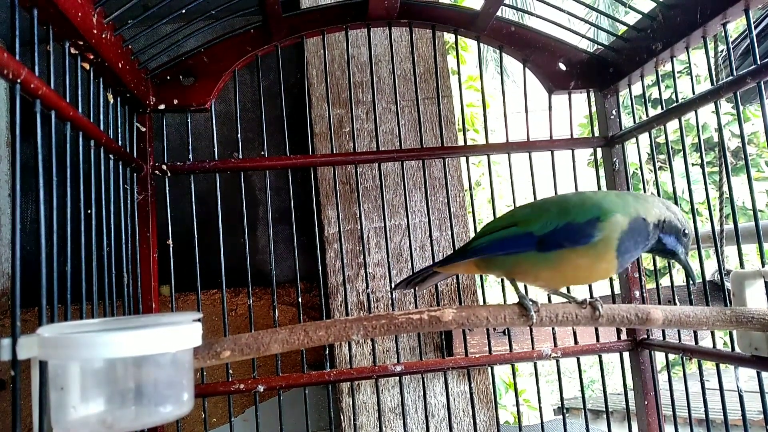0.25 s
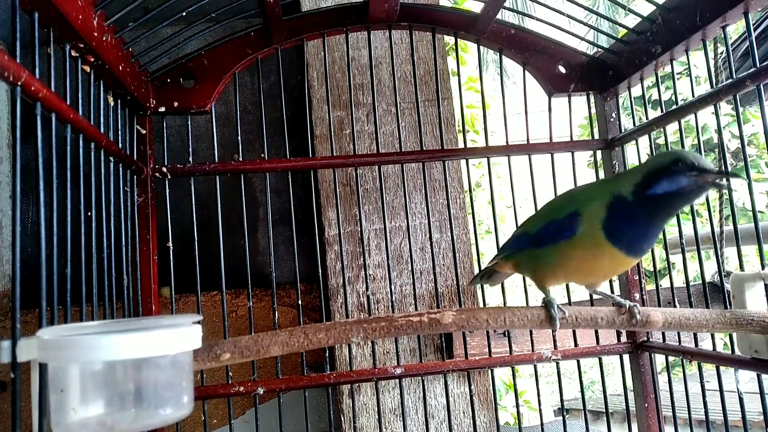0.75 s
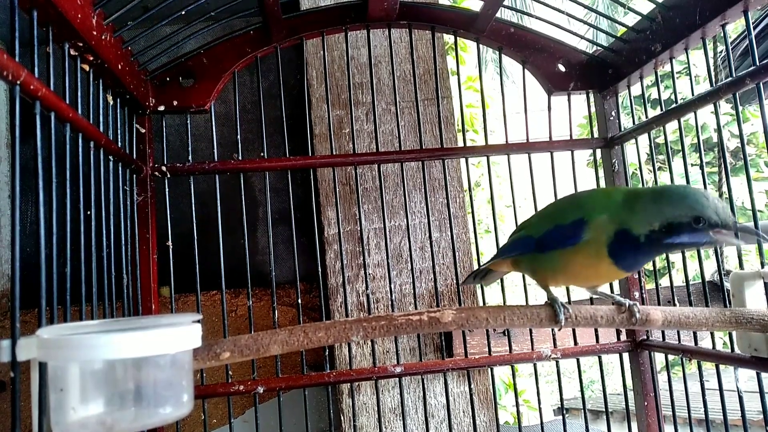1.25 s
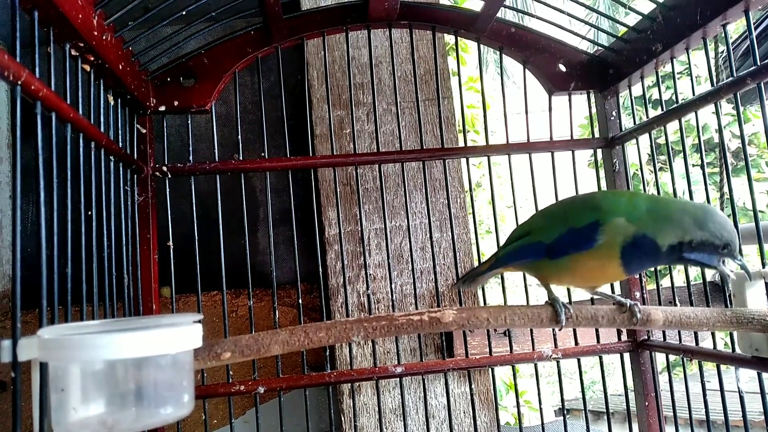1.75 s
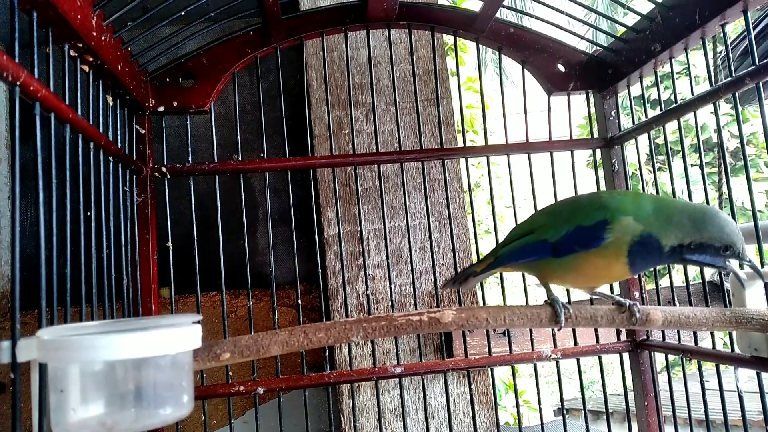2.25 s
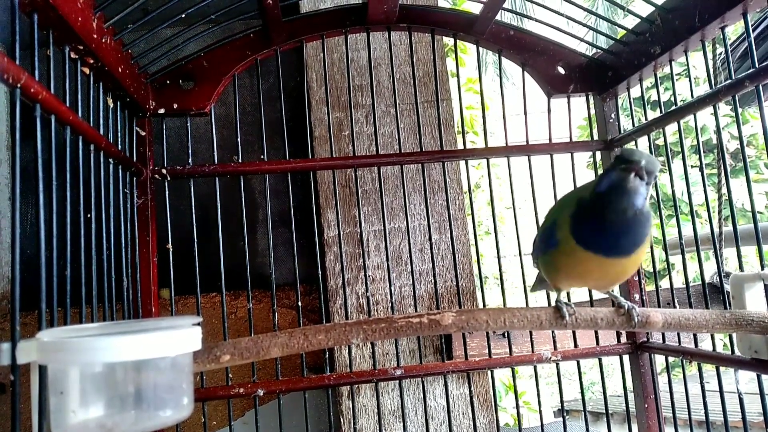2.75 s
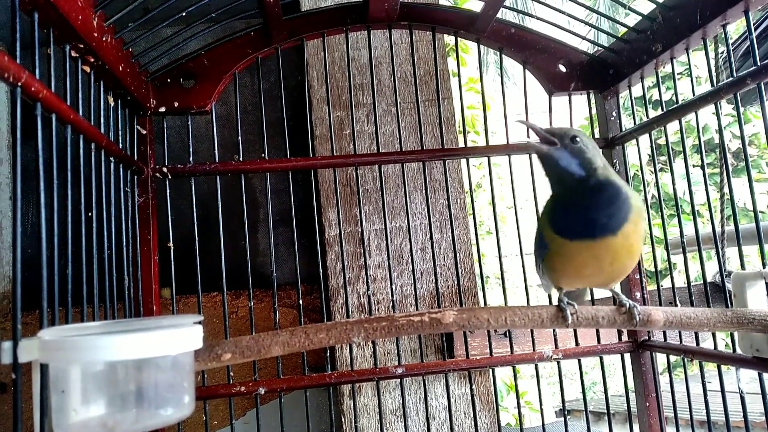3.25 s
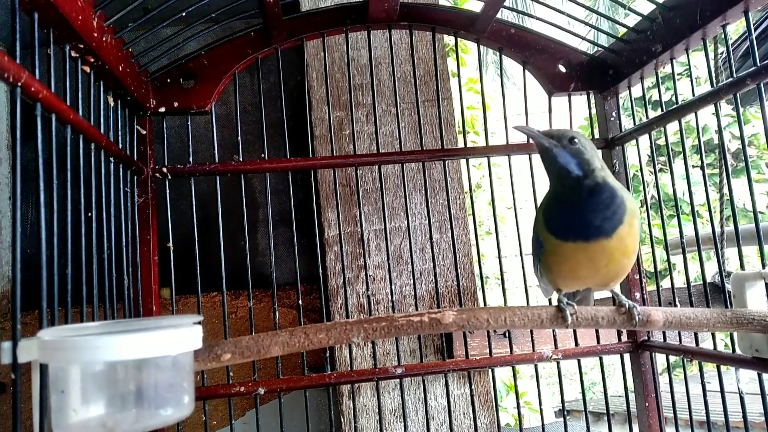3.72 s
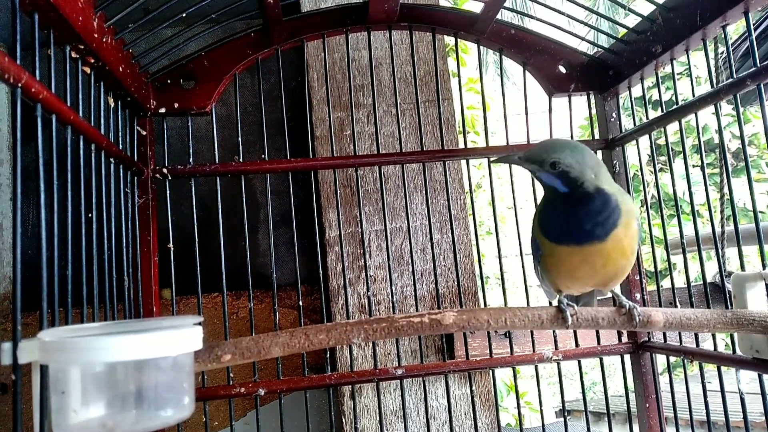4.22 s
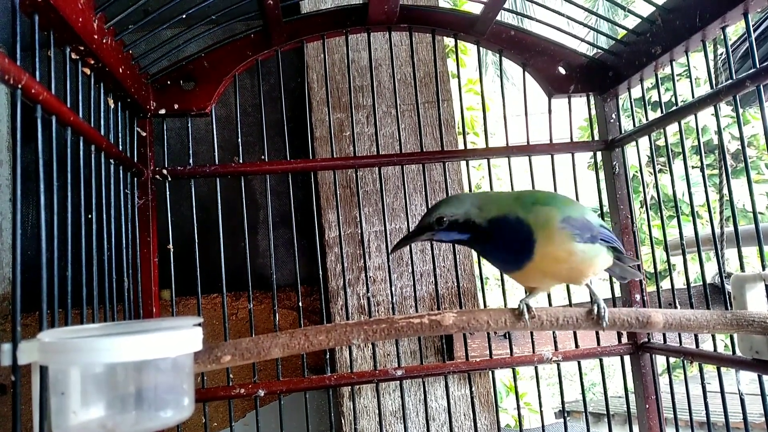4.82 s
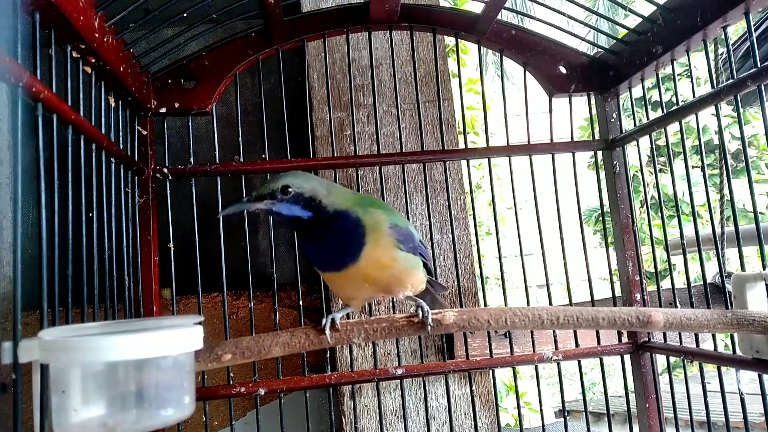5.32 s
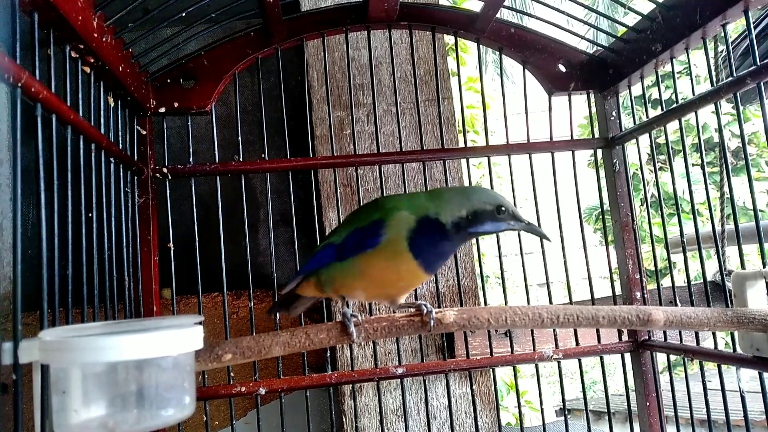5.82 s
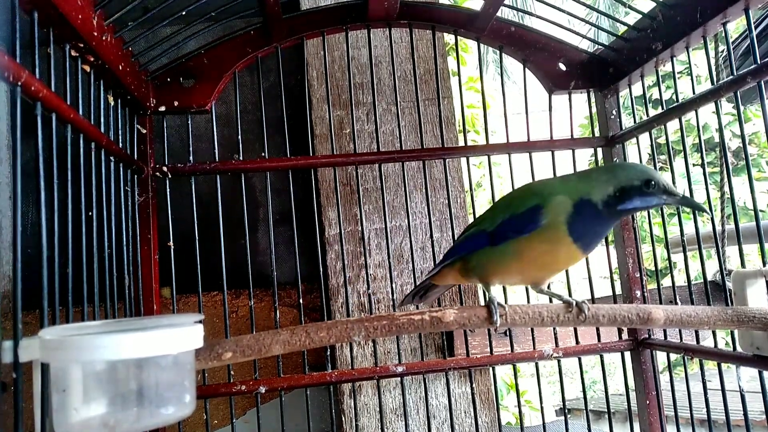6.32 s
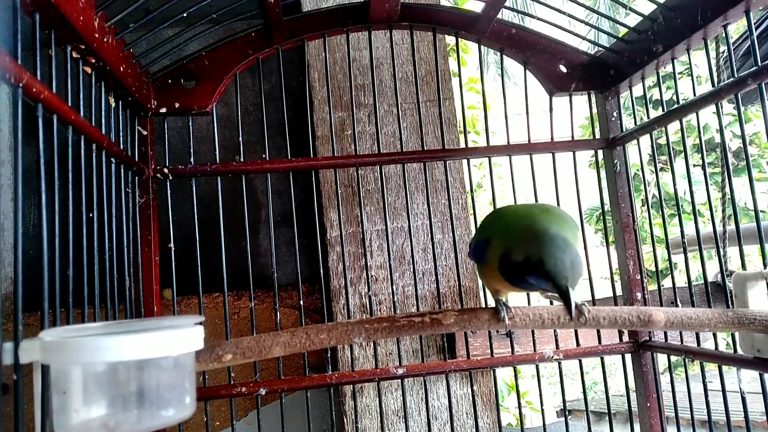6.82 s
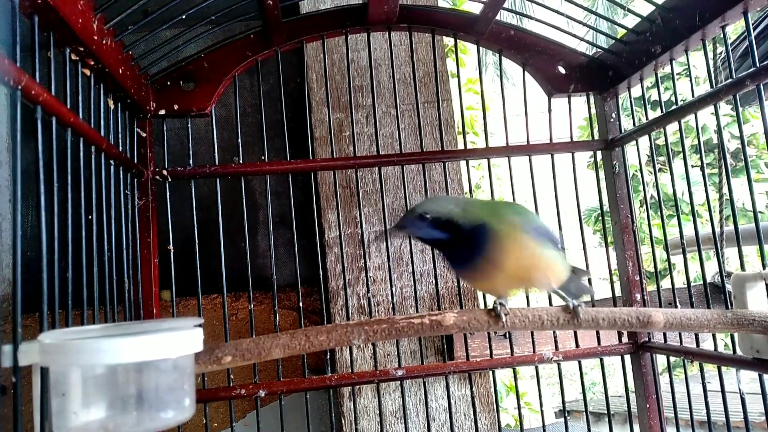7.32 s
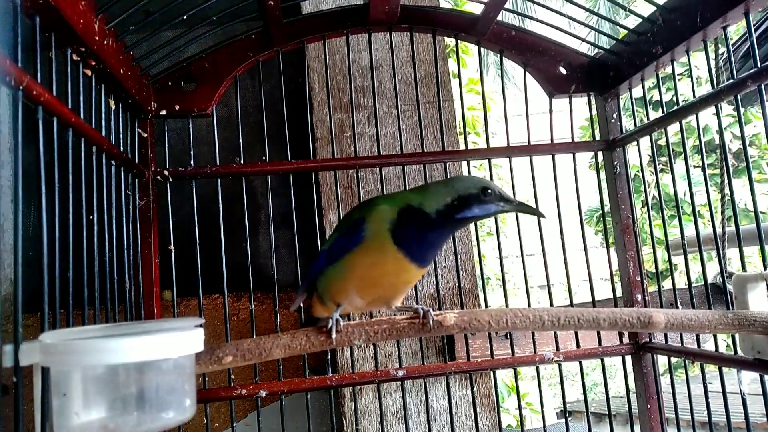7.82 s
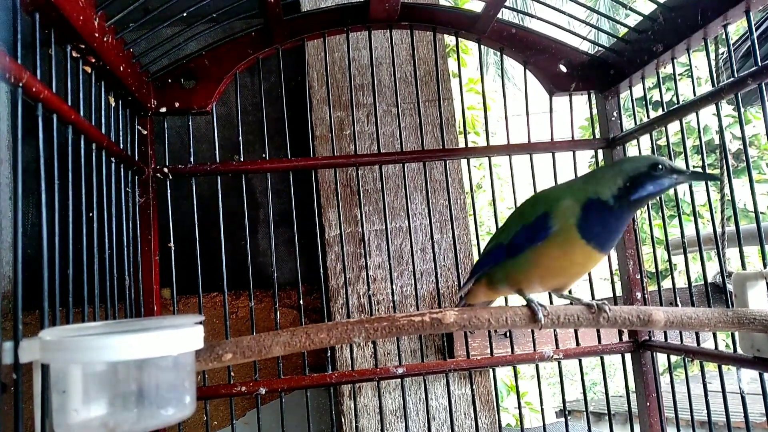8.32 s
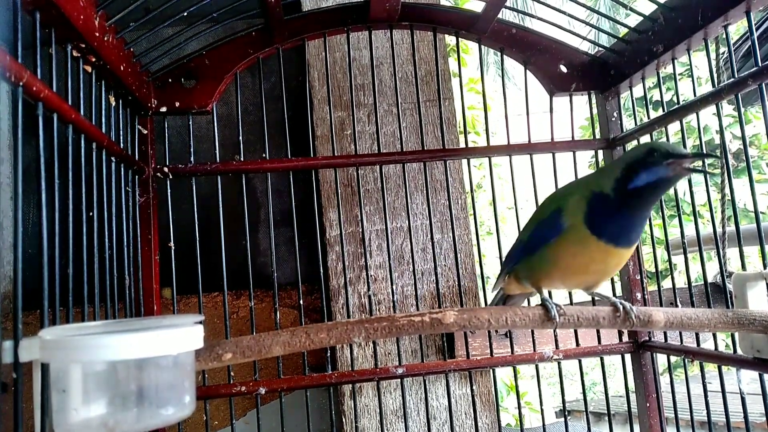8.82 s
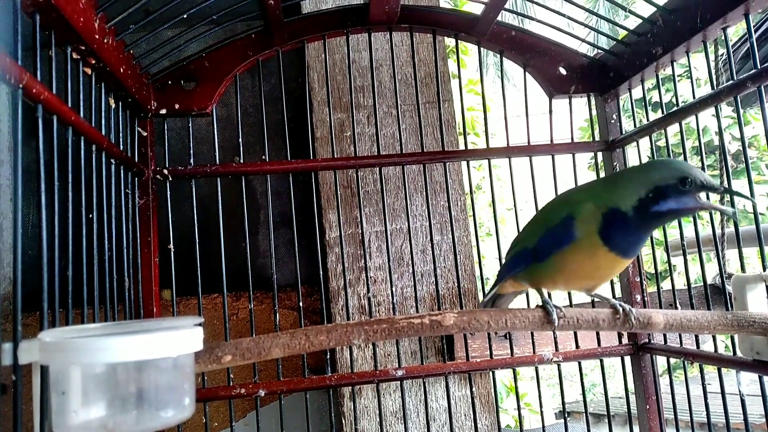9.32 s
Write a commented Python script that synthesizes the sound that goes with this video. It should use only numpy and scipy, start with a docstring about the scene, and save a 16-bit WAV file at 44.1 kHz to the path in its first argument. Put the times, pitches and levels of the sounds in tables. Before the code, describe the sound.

Loud chattering, buzzing bird scolding erupts near the microphone on a hard-walled porch, with far birds warbling, a very high insect tick and hopping knocks.

```python
"""A caged songbird rattles and rasps close to a two-port microphone on a small hard-walled porch.
Other birds whistle further off, an insect ticks very high, wood and wires knock and clink, and a low
hum wavers under a hiss whose treble swells now and then. Birds are phase oscillators with shaking
pitch, coloured by throat and breath; ticks and blows are noise bursts ringing resonances; hum and hiss
are shaped noise, with a drone of gliding tones. Decaying noise echoes form the porch and the yard."""
import sys
import numpy as np
from scipy import signal
from scipy.fft import rfft, irfft
from scipy.io import wavfile
from scipy.ndimage import uniform_filter1d, minimum_filter1d

SR = 44100
rng = np.random.default_rng(int(sys.argv[2]) if len(sys.argv) > 2 else 0)


def store_pcm(level_fs):
    """Save levels as 16-bit WAV."""
    pcm = np.round(np.clip(level_fs, -1, 1) * 32767).astype(np.int16)
    wavfile.write(sys.argv[1], SR, np.atleast_2d(pcm).T)


N = 421596
T = np.arange(N) / SR


def undb(db):
    """Amplitude ratio of a level in decibels."""
    return 10 ** (np.asarray(db) / 20)


def unit(x):
    """Normalization to a root-mean-square of one."""
    return x / np.sqrt(np.mean(x ** 2))


def walk(rate, size=N):
    """Slow noise by sample and hold: random levels held 1 / rate s, then slewed; spread near 1."""
    k = max(int(SR / rate), 2)
    held = np.repeat(rng.standard_normal(size // k + 1), k)
    return 1.32 * uniform_filter1d(held, k)[:size]


def resonate(x, modes):
    """Modal superposition: a sum of two-pole resonances (pitch_hz, width_hz, level_db)."""
    return sum(undb(db) * signal.lfilter(*signal.iirpeak(hz, hz / width, fs=SR), x)
               for hz, width, db in modes)


def add(out, s, x):
    """Linear superposition of x on out from s seconds."""
    i = int(s * SR)
    out[i:i + len(x)] += x[:len(out) - i]


def lay(table):
    """Linear interpolation of a curve table: start time, soft-edged window and its columns by sample."""
    s, *columns = np.transpose(table)
    t = np.arange(s[0], s[-1], 1 / SR)
    edge = np.clip(np.minimum(t - s[0], s[-1] - t) / .004, 0, 1)
    return s[0], edge, [np.interp(t, s, c) for c in columns]


def tone(hz, jitter, rate):
    """Frequency modulation: the phase is the integral of a pitch that shakes by the share jitter."""
    return np.cumsum(2 * np.pi * hz * (1 + jitter * walk(rate, size=len(hz))) / SR)


def flutter(size, hz, depth, start):
    """Amplitude modulation: a quick uneven throb of beating membranes, from a share of its cycle."""
    phase = tone(np.full(size, hz), 0.091, 52.9) + 2 * np.pi * start
    return unit(1 + depth * np.sin(phase))


def glides(tables, jitter, rate=360.0):
    """Frequency-modulated near-sine notes following curves of (time_s, pitch_hz, level_db)."""
    out = np.zeros(N)
    for note in tables:
        s, edge, (hz, db) = lay(note)
        add(out, s, np.sqrt(2) * undb(db) * edge * np.sin(tone(hz, jitter, rate)))
    return out


def slides(rows, swell_db, fade_db):
    """Piecewise-linear glides: notes swell, slide to a turning pitch and fade towards their end pitch."""
    curves = []
    for s, length, start_hz, turn_hz, end_hz, turn, db in rows:
        early_hz = start_hz + 0.3 * (turn_hz - start_hz)
        curves.append([(s, start_hz, db - 13.5), (s + 0.3 * turn * length, early_hz, db - swell_db),
                       (s + turn * length, turn_hz, db), (s + length, end_hz, db - fade_db)])
    return curves


def place(x, t60, wet_db, tail_t60, tail_db, pan_db):
    """Reverberation and arrival delay: left port first, then echoes of near walls and wider yard."""
    port_lag_s = 5 / 44100
    t = np.arange(int(.6 * SR)) / SR
    late = np.clip(t / 0.0012 - 1, 0, 1)
    walls = unit(late * 1000 ** (-t / t60)) * undb(wet_db)
    yard = unit(late * 1000 ** (-t / tail_t60)) * undb(tail_db)
    # each port has its own echo
    echo = (walls + yard) * rng.standard_normal((2, len(t))) / np.sqrt(len(t))
    echo[0, 0] += undb(pan_db / 2)
    echo[1, round(port_lag_s * SR)] += undb(-pan_db / 2)
    return signal.oaconvolve(x[None], echo, axes=1)[:, :N]


def rumble():
    """Resonant filtering of noise: low modes make a wavering hum, nearly alike at both ports."""
    # level before the waver: time_s, level_db
    hum_level = [(0.0, -57), (0.12, -47), (0.85, -48.5), (2.6, -47), (3.89, -48), (4.049, -109),
                 (4.15, -49), (4.26, -40), (4.39, -57), (4.52, -46.5), (4.76, -47), (5.06, -69),
                 (5.22, -42), (5.3, -61), (6.47, -60), (6.52, -44), (6.9, -48), (7.1, -54), (7.64, -42.5),
                 (8.2, -40.5), (8.49, -42.5), (9.2, -40), (9.35, -50.5), (9.56, -43)]
    # low resonances: pitch_hz, width_hz, level_db
    low_modes = [(73, 188, -3.5), (100, 6.9, 10), (125, 5, -25)]
    waver_db, waver_per_s = 3.5, 6.5
    s, db = np.transpose(hum_level)
    mid, side = rng.standard_normal((2, N))
    ports = mid + 0.11 * side * np.array([[1], [-1]])
    low = unit(resonate(resonate(ports, low_modes), [(100, 97, 0)]))
    return low * undb(np.interp(T, s, db) + waver_db * walk(waver_per_s))


def air():
    """Spectral shaping of noise: a hiss more alike at both ports in the bass than in the treble."""
    # relative spectrum of the hiss: frequency_hz, density_db
    spectrum = [(18, -60), (30, -25), (108, -3.5), (177, -9), (249, -9), (292, -20.5), (332, -11),
                (1590, -21.5), (3320, -25), (6210, -31), (11300, -32), (13600, -51), (15500, -32.5)]
    level_db, wander_db = -50.5, 0.5
    hz = np.maximum(np.arange(N // 2 + 1) * SR / N, 1)
    curve_hz, curve_db = np.transpose(spectrum)
    gain = undb(np.interp(np.log(hz), np.log(curve_hz), curve_db))
    mid, side = (rfft(rng.standard_normal(N)) * gain for _ in range(2))
    side = side * np.clip(0.35 + hz / 2100.0, 0, 1)
    return undb(level_db + wander_db * walk(3.2)) * unit(irfft([mid + side, mid - side], N))


def warble():
    """Frequency modulation: a far bird's sliding notes are near-sines of gliding pitch."""
    # notes: start_s, length_s, start_hz, turn_hz, end_hz, turn_share (of length), level_db (at the turn)
    far_notes = [(0.0, 0.066, 3490, 3533, 3530, 0.49, -42), (0.03, 0.088, 3680, 3910, 3840, 0.57, -53),
                 (0.155, 0.15, 3690, 2852, 2866, 0.46, -45.5), (0.4, 0.16, 3360, 3643, 3600, 0.38, -44.5),
                 (6.775, 0.15, 3510, 3547, 3550, 0.3, -47.5), (6.88, 0.083, 3220, 2790, 2800, 0.53, -39),
                 (7.16, 0.083, 3050, 3220, 3290, 0.32, -43.5), (7.245, 0.18, 3440, 3860, 3354, 0.4, -45.5),
                 (7.44, 0.09, 3030, 2800, 2820, 0.42, -42), (7.62, 0.076, 3095, 3340, 3270, 0.69, -43.5),
                 (7.68, 0.11, 3440, 3923, 3870, .65, -42), (7.8, 0.061, 2860, 2916, 2840, 0.28, -49),
                 (7.99, 0.076, 3060, 3290, 3260, 0.39, -44.5), (8.105, 0.041, 3010, 2840, 2544, 0.41, -43),
                 (8.255, 0.13, 3060, 3390, 3360, 0.7, -43), (8.4, 0.055, 3210, 2930, 2900, 0.54, -43.5)]
    return glides(slides(far_notes, 0.69, 4.6), 0.018)


def ticks():
    """Resonance under friction: an insect's short scrape rings a narrow, very high mode."""
    # a little under five a second: time_s (8 ms into the scrape), peak_db (before placing)
    tick_rows = [(0.148, -37), (0.359, -33), (0.567, -33.5), (3.441, -44), (3.643, -41), (3.839, -35.5),
                 (4.041, -42), (4.248, -36), (4.458, -39), (4.666, -37), (4.87, -37), (5.081, -37),
                 (5.286, -38.5), (5.493, -36), (5.692, -36.5), (5.91, -39), (6.125, -39), (6.335, -40),
                 (6.542, -36), (6.75, -40), (7.164, -33), (7.371, -31.5), (7.584, -35.5), (7.786, -33),
                 (7.992, -38), (8.21, -37), (8.421, -39)]
    centre_hz, spread_hz = 13650, 250
    out, t = np.zeros(N), T[:4000]
    for s, db in tick_rows:
        hz = centre_hz + spread_hz * rng.standard_normal()
        scrape = rng.standard_normal(len(t)) * (1 - np.exp(-t / .008)) ** 2 * 1000 ** (-t / .09)
        ring = resonate(resonate(scrape, [(hz, 700, 0)]), [(hz, 1300, 0)])
        add(out, s - .008, undb(db) * ring / abs(ring).max())
    return out


def knocks():
    """Modal excitation: feet and beaks strike perches and bars, an uneven blow waking wooden modes."""
    # blows: start_s, peak_db (of the dull part), brightness_db (bright peak over dull peak)
    blows = [(0.148, -56, 15), (0.352, -44.5, 11.5), (0.476, -35, -6), (1.408, -30, 8), (3.416, -46.5, 11),
             (3.545, -32.5, -50), (3.581, -40, -6), (3.766, -47.5, 7.5), (3.985, -50, 5),
             (4.311, -38.5, -19), (4.642, -40, -12), (5.047, -38.5, -15), (5.077, -35, -4.5),
             (5.1, -41.5, 7.5), (5.464, -39.5, -0.5), (5.62, -39.5, 6), (5.812, -40.5, 0.5),
             (5.845, -42.5, 4), (5.972, -38, -16), (6.221, -37, -26), (6.331, -40, 9.5), (6.536, -31.5, 0),
             (6.932, -52, 26), (7.2, -38.5, 0), (7.288, -40.5, 3), (7.328, -47, 3), (7.389, -40, 0.5),
             (7.667, -46, -13), (7.775, -43, 10), (7.864, -39, 2.5), (7.936, -36, -2), (8.056, -42.5, 11),
             (8.159, -38.5, -9), (9.476, -36.5, 6)]
    # dull modes before scatter: pitch_hz, width_hz, level_db
    dull_modes = [(413, 63, -6), (630, 92, 1), (918, 97, -1.5), (1300, 330, -12)]
    # bright modes before scatter: pitch_hz, width_hz, level_db
    bright_modes = [(1900, 1250, 8), (2800, 1100, 11), (5130, 8800, -13)]
    blow_t60_s, scatter_db = 0.095, 3.5
    out, t = np.zeros(N), T[:6000]
    for s, db, bright_db in blows:
        blow = rng.standard_normal(len(t)) * undb(3.9 * walk(252.0, size=len(t)))
        blow *= np.clip(t / 0.0013, 0, 1) * 1000 ** (-t / blow_t60_s)
        parts = []
        for modes in (dull_modes, bright_modes):
            # each blow lands elsewhere and wakes the modes differently
            woken = [(hz, width, mode_db + scatter_db * rng.standard_normal()) for hz, width, mode_db in modes]
            ring = resonate(blow, woken)
            parts.append(ring / abs(ring).max())
        dull, bright = parts
        add(out, s, undb(db) * (dull + undb(bright_db) * bright))
    return out


def whistles():
    """Frequency modulation: neighbouring birds' clear whistles are near-sines turning in pitch."""
    # notes: start_s, length_s, start_hz, turn_hz, end_hz, turn_share (of length), level_db (at the turn)
    clear_notes = [(0.536, 0.1, 2540, 2504, 2460, 0.59, -38.5), (1.022, 0.055, 2560, 2540, 2490, .7, -30),
                   (1.075, 0.091, 1808, 1928, 1820, 0.68, -13), (1.198, 0.083, 1938, 1942, 1803, 0.54, -14),
                   (1.32, 0.078, 1924, 1874, 1858, 0.56, -11), (1.5, 0.088, 1858, 1805, 1744, 0.67, -11)]
    return glides(slides(clear_notes, 4.0, 11.0), .011, 120.)


def syllables():
    """Pitch contours of membrane tension: dips that climb back, then arches that rise, hold and plunge.
    Rows: start_s, level_db, length_s, breath_db, places (shares), four pitches_hz, closing_fade_db."""
    # scolding dips: start_s, level_db, length_s, breath_db, lowest_hz
    dip_rows = [(0.648, -34, 0.036, 12, 2170), (0.667, -12, 0.061, -8.5, 1397), (0.72, -6, 0.049, -6, 1690),
                (0.78, -8.5, 0.033, -5.5, 1503), (0.823, -8.5, 0.051, -5, 1708),
                (0.882, -17, 0.046, 3, 1504), (1.603, -24, 0.042, -11, 903), (3.153, -9.5, 0.05, -1, 1050),
                (8.528, -36, 0.029, 9.5, 2190), (8.549, -16, 0.06, 0.5, 1388),
                (8.605, -15, 0.063, 0.5, 1373), (8.667, -21, 0.03, 6, 1023), (8.722, -33, 0.032, -4, 720),
                (9.095, -33, 0.04, -2, 786)]
    # places of the four pitches in a dip: share_of_length
    dip_places = [0., .2, .48, 1.]
    # rattle arches: start_s, level_db (before the fade), length_s, breath_db
    arch_rows = [(0.928, -18, 0.02, 11), (0.978, -19.5, 0.043, 6.5), (1.067, -16.5, 0.058, 1),
                 (1.146, -13.5, 0.054, 2.5), (1.249, -17.5, 0.056, 2.5), (1.328, -14.5, 0.069, -5.5),
                 (1.428, -9.5, 0.057, -4.5), (1.509, -27, 0.081, 7.5), (1.557, -13.5, 0.065, -3.5),
                 (1.628, -16, 0.063, -4.5), (1.712, -16.5, 0.054, -2.5), (1.786, -19, 0.053, 3),
                 (1.857, -28, 0.056, 7), (1.927, -17, 0.042, 2), (1.996, -13.5, 0.044, -1.5),
                 (2.068, -15.5, 0.041, 3), (2.131, -16.5, 0.047, -2.5), (2.196, -14.5, 0.048, -4),
                 (2.258, -10.5, 0.046, -10.5), (2.322, -9.5, 0.042, -9), (2.386, -11.5, 0.041, -5.5),
                 (2.449, -10.5, 0.035, -2.5), (2.514, -12, 0.042, -5.5), (2.576, -8, 0.045, -9),
                 (2.643, -10.5, 0.048, -5.5), (2.709, -8, 0.045, -6.5), (2.775, -7, 0.042, -9.5),
                 (2.842, -4, 0.039, -10), (2.91, -5.5, 0.043, -9), (2.969, -7.5, 0.047, -8),
                 (3.042, -10, 0.049, -5), (3.114, -12, 0.056, -3.5), (3.203, -19, 0.034, 3),
                 (3.266, -18, 0.06, -6), (8.693, -8, 0.036, -3.5), (8.744, -13, 0.047, -2.5),
                 (8.815, -2.5, 0.03, -7.5), (8.876, -6, 0.038, -5.5), (8.943, -12.5, 0.041, -0.5),
                 (9.001, -16, 0.042, 4), (9.06, -22.5, 0.045, 6.5), (9.109, -16.5, 0.064, -2.5),
                 (9.19, -18, 0.059, -3), (9.263, -18.5, 0.054, -2), (9.337, -23, 0.064, 2),
                 (9.409, -12, 0.055, -4), (9.496, -15.5, 0.054, -1)]
    # first and last pitch of an arch before scatter: pitch_hz
    arch_ends = [1552, 832]
    # drift of the arch tops through a bout, before scatter: time_s, early_hz, late_hz
    arch_tops = [(1.0, 2227, 2266), (1.6, 2250, 2145), (2.3, 2125, 2120), (2.7, 2135, 2040),
                 (3.0, 2232, 2212), (3.3, 2204, 2120), (8.7, 2245, 2440), (9.0, 2178, 2460),
                 (9.2, 2210, 2218), (9.5, 2247, 2164)]
    dip_from_hz, dip_to_hz, climb_share = 2350, 2522, 0.061  # share of the climb done at the third place
    rise_s, plunge_s, plunge_fade_db, pitch_scatter = 0.00704, 0.016, 6, 0.03
    rows = []
    for *row, low_hz in dip_rows:
        back_hz = low_hz + climb_share * (dip_to_hz - low_hz)
        rows.append((*row, dip_places, [dip_from_hz, low_hz, back_hz, dip_to_hz], 0))
    top_s, early, late = np.transpose(arch_tops)
    for s, db, length, breath_db in arch_rows:
        places = [0, min(rise_s / length, .4), max(1 - plunge_s / length, .45), 1]
        tops = [np.interp(s, top_s, early), np.interp(s, top_s, late)]
        pitch = np.array([arch_ends[0], *tops, arch_ends[1]])
        pitch = pitch * (1 + pitch_scatter * rng.standard_normal(4))
        rows.append((s, db, length, breath_db, places, pitch, plunge_fade_db))
    return rows


def rattle():
    """Source and filter: the throat favours overtones near its peaks, and taut membranes roughen.
    Returns the voice and its breath."""
    # throat response: frequency_hz, level_db
    throat = [(800, -6), (1400, -6), (2200, 7.5), (2750, 7), (3400, 5), (4200, 9), (5100, -5), (5600, 6),
              (6500, 5), (8000, 5), (10000, -60), (13000, -49)]
    # breath resonances: pitch_hz, width_hz, level_db (relative)
    breath_modes = [(4090, 740, 13), (5540, 300, 2), (7460, 750, 2), (9170, 730, -1.5), (13200, 1000, -32)]
    octave_at_24_db, octave_per_db = 8.5, 0.62  # octave boost of a -24 dB syllable, its rise with level
    hiss_db, hoarse_db = -5.5, -0.5  # hiss at the beak; noisy octave that rides on the pitch
    colour_scatter_db, crackle, dip_shake = 2.5, .45, .45
    slack_below_hz, slack_fade_db = 1600, 20
    out, gasps = np.zeros(N), np.zeros(N)
    throat_hz, throat_db = np.transpose(throat)
    for s, db, length, breath_db, places, pitch, fade_db in syllables():
        colour_db = colour_scatter_db * rng.standard_normal(size=7)  # the beak gapes differently each time
        octave_db = octave_at_24_db + octave_per_db * (db + 24.0)
        u = np.arange(int(length * SR)) / (length * SR)
        hz = uniform_filter1d(np.interp(u, places, pitch), 150)
        closing = (u - places[2]) / (1 - places[2])
        # arches stay rough up to the plunge; dips are cleaner
        arch = (fade_db > 0) * np.clip(1.2 - 1.5 * closing, 0, 1)
        taut = (hz / 2100) ** 3
        shake = np.clip(.03 + .05 * undb(breath_db), 0, .07) * np.maximum(taut, arch * .8)
        phase = tone(hz, shake * (1 if fade_db else dip_shake), 900.)

        # overtones fade when the membranes slacken
        slack_db = slack_fade_db * np.clip((slack_below_hz - hz) / 300, 0, 1)
        voice = np.zeros(len(u))
        for k in range(1, 7):
            overtone_db = np.interp(np.log(k * hz), np.log(throat_hz), throat_db) - 4.9 * k
            overtone_db = overtone_db + colour_db[k] + (k == 2) * octave_db - (k > 1) * slack_db
            voice += undb(overtone_db) * np.sin(k * phase)
        voice = unit(voice * (1 + arch * crackle * walk(500., size=len(u))))
        octave = np.sin(tone(2 * hz, 0, 900.))
        hoarse = undb(breath_db + hoarse_db) * taut * walk(1100., size=len(u)) * octave

        throb = flutter(len(u), 185.5, 0.32, rng.random())
        shape = undb(db - fade_db * np.clip(closing, 0, 1))
        shape = shape * (1 + np.clip(taut, 0, 1) * (throb - 1))
        shape *= np.clip((1 - u) * length / 0.00024, 0, 1)
        add(out, s, shape * np.clip(u * length / 0.0046, 0, 1) ** 2 * (voice + hoarse))
        # the breath leads the voice by 6 ms
        puff = undb(breath_db - 1.5 + 4.5 * walk(300., size=len(u)))
        add(gasps, s - .006, shape * taut * np.clip(u * length / .014, 0, 1) * puff)
    hiss = unit(resonate(rng.standard_normal(N), breath_modes))
    return out, undb(hiss_db) * gasps * hiss


def buzz():
    """Amplitude modulation: a deep throb chops nearly pure notes from the other side of the syrinx."""
    # notes: start_s, level_db (before weakening), length_s, start_hz, end_hz
    buzz_rows = [(0.751, -2.5, 0.023, 2325, 2710), (0.81, -12, 0.016, 2900, 2420),
                 (0.864, -9, 0.016, 2830, 2500), (0.914, -10.5, 0.029, 2600, 2550),
                 (0.998, -14, 0.012, 2550, 3050), (1.085, -10, 0.021, 2410.0, 2840),
                 (1.167, -6.5, 0.013, 2640, 2800.0), (1.273, -22, 0.041, 2450, 2940),
                 (1.355, -13.5, 0.035, 2480, 2720), (1.523, -12.5, 0.034, 3110, 3090),
                 (1.571, -6, 0.048, 2900, 3320), (1.634, -4.5, 0.048, 2800, 2960),
                 (1.654, -11.5, 0.045, 3470, 3610), (1.718, -1.5, 0.033, 2750, 3100),
                 (1.749, -15.5, 0.025, 3230, 3670), (1.796, -1.5, 0.031, 2800, 3270),
                 (1.801, -24, 0.036, 3504, 3720), (1.862, -8, 0.039, 2800, 3134),
                 (1.866, -8, 0.04, 3460, 3650), (1.934, 0, 0.02, 2965, 2997),
                 (2.006, -2.5, 0.024, 2910, 2870), (2.074, -4.5, 0.027, 2810, 2996),
                 (2.142, -13.5, 0.036, 2800, 3160), (2.214, -10.5, 0.026, 2730, 3110),
                 (2.292, -18.5, 0.016, 3630, 2730), (2.349, -21, 0.025, 3300, 2840),
                 (2.404, -14, 0.019, 3370, 2750), (2.475, -17.5, 0.017, 3390, 2640),
                 (2.789, -8.5, 0.018, 2280, 2800.0), (2.978, -18, 0.033, 2940, 2830),
                 (3.056, -2.5, 0.025, 3530, 3420), (3.127, 2.5, 0.026, 3500, 3700),
                 (3.16, -13.5, 0.031, 3400, 3750), (3.196, 2, 0.0283, 3514, 3736),
                 (3.227, -20, 0.022, 3480, 3570), (3.281, -4.5, 0.035, 3696, 3400),
                 (8.761, -10, 0.015, 2500, 2710), (8.954, -14, 0.023, 2455, 2880),
                 (9.01, -14, 0.028, 2650, 2910), (9.065, -11, 0.04, 2196, 3450),
                 (9.123, -5, 0.043, 3500, 3880), (9.153, -19, 0.04, 3600, 3210),
                 (9.199, -10, 0.019, 2480, 3590), (9.214, -7.5, 0.036, 3590, 3270),
                 (9.269, -9.5, 0.028, 2326, 3630), (9.293, -13, 0.039, 3480, 3150),
                 (9.342, -11, 0.027, 2377, 3550), (9.365, -11, 0.037, 3370, 3120),
                 (9.415, -8, 0.03, 2274, 3180), (9.438, -7, 0.026, 3290, 3163),
                 (9.499, -12, 0.027, 2250, 3190), (9.518, -11, 0.029, 3230, 3200)]
    low_loss_db_per_khz, fade_db = 13, 4  # weaker under 3 kHz; fades a little along the note
    out = np.zeros(N)
    for s, db, length, start_hz, end_hz in buzz_rows:
        u = np.arange(int(length * SR)) / (length * SR)
        edge = np.clip(np.minimum(u / .0015, (1 - u) / .004) * length, 0, 1)
        shape = edge * unit(flutter(len(u), 155., .9, -.1) ** 1.5)
        hz = start_hz + (end_hz - start_hz) * u
        weak_db = low_loss_db_per_khz * np.clip(3 - hz / 1000, 0, 1) + fade_db * (u - .5)
        jitter = np.clip(2.2 * length, .05, .075)  # long notes are hoarser
        add(out, s, np.sqrt(2) * undb(db - weak_db) * shape * np.sin(tone(hz, jitter, 900.)))
    return out


def clinks():
    """Modal ringing: short rattling noise excites the high resonances of thin wires."""
    # clinks: start_s, peak_db (before placing)
    clink_rows = [(3.641, -34.5), (4.0374, -30.5), (5.908, -36)]
    # wire resonances: pitch_hz, width_hz, level_db (relative)
    wire_modes = [(5690, 140, 5), (7030, 160, -1), (10530, 450, -13.5)]
    out, t = np.zeros(N), T[:6000]
    for s, db in clink_rows:
        jangle = rng.standard_normal(len(t)) * np.clip(t / .01, 0, 1) * 1000 ** (-t / .07)
        ring = resonate(jangle, wire_modes)
        add(out, s, undb(db) * ring / abs(ring).max())
    return out


def swells():
    """Incoherent band noise under bell-shaped envelopes: soft treble rises, unrelated at the two ports."""
    # rises: middle_s, length_s (between the 1/e points), level_db (at the middle)
    swell_rows = [(4.45, 0.64, -58), (7.152, 0.45, -53), (8.034, 0.78, -51)]
    # treble band, passed twice: pitch_hz, width_hz, level_db
    treble_band = [(7340, 5400, 0)]
    level = sum(undb(db) * np.exp(-(2 * (T - s) / length) ** 2) for s, length, db in swell_rows)
    hiss = resonate(resonate(rng.standard_normal((2, N)), treble_band), treble_band)
    return level * unit(hiss)


def faint_calls():
    """Random frequency modulation: strong quick pitch shake makes far-off calls hoarse."""
    # one curve a call: time_s, pitch_hz, level_db
    call_curves = [
        [(5.775, 2600, -54), (5.83, 2740, -57), (5.86, 2900, -69), (5.885, 3310, -53), (5.91, 3270, -66)],
        [(6.28, 2790, -58), (6.33, 2634, -53), (6.4, 2776, -59), (6.46, 3180, -56), (6.52, 3210, -60)],
    ]
    return glides(call_curves, 0.0727, 900.)


def rasp():
    """Two independent oscillators: both sides of the syrinx sound roughly with a rush of breath."""
    # rasps: start_s, length_s, level_db (added to the course), extra_breath_db, end_change_db
    rasp_rows = [(6.548, 0.228, -11.5, -4, -0.5), (6.93, 0.15, -11, 0, -7.5)]
    # course of a rasp: share_of_length, level_db, low_hz, high_hz, high_db, breath_db
    course = [(0.001, -33, 1300, 2897, 17.5, -3), (0.151, -19.5, 1900, 3102, 14.5, 4),
              (0.302, -6.5, 2165, 3546, 11, 3.5), (0.452, -10, 2429, 3500, -12, -3),
              (0.7, -2, 2620, 3350, -20, -12), (0.88, -6.5, 2450, 3280, -10, -28),
              (0.999, -36, 2260, 3020, -10, 3)]
    # breath resonances: pitch_hz, width_hz, level_db (relative)
    rush_modes = [(4270, 790, 15.5), (7300, 2700, 4.5), (9400, 1800, 5), (12300, 200, 8)]
    out = np.zeros(N)
    for start, length, top_db, extra_db, change_db in rasp_rows:
        curve = [(start + u * length, *rest) for u, *rest in course]
        s, edge, (db, low_hz, high_hz, high_db, breath_db) = lay(curve)
        size = len(db)
        low, high = tone(low_hz, .06, 900.), tone(high_hz, .09, 1200.)
        voice = np.sin(low) + undb(-21.5) * np.sin(2 * low) + undb(high_db) * np.sin(high)
        rush = undb(breath_db + extra_db) * unit(resonate(rng.standard_normal(size), rush_modes))
        level = undb(db + top_db + np.linspace(0, change_db, size) + 4 * walk(200., size=size))
        add(out, s, level * edge * flutter(size, 170., .8, rng.random()) * (voice + rush))
    return out


def drone():
    """Frequency modulation: a motor-like drone of low near-sine tones comes and goes."""
    # one curve a tone: time_s, pitch_hz, level_db
    drone_curves = [
        [(7.45, 112.8, -62), (7.6, 103.4, -34.5), (7.8, 103.6, -41), (8.05, 100.6, -38.5), (8.25, 100, -50)],
        [(7.55, 119.7, -40), (7.65, 118.2, -35), (7.85, 119, -39), (7.95, 117, -38)],
        [(8.22, 124.8, -48), (8.35, 125, -36.5), (8.5, 127.5, -31.5), (8.7, 130.3, -38), (8.95, 125, -35),
         (9.15, 119, -42.5), (9.3, 117, -46)],
    ]
    return glides(drone_curves, 0.012, 17.7)


def taps():
    """Damped oscillation: small things tap as decaying sines."""
    # taps: start_s, level_db (of the undamped sine's peak), pitch_hz
    tap_rows = [(7.777, -26, 1280), (7.934, -30, 2120)]
    t60_s = 0.019
    out, t = np.zeros(N), T[:6000]
    for s, db, hz in tap_rows:
        shape = np.clip(t / 0.0012, 0, 1) * 1000 ** (-t / t60_s)
        add(out, s, undb(db) * shape * np.sin(2 * np.pi * hz * t))
    return out


def scene():
    """Superposition of all sources, each with its own balance of direct and reflected sound."""
    hum = (rumble() + drone()) * undb([[-1.5], [1.5]])  # a little stronger on the right
    far = place(warble() + faint_calls(), 0.12, 3.3, 1.0, -0.45, 0.92)
    insect = place(ticks(), 0.024, 2.1, 0.17, -23.5, 11.0)
    strikes = place(knocks() + clinks() + taps(), 0.012, -7.0, 0.12, 0.0, 7.5)
    neighbour = place(whistles(), .1, -5., .4, -20., 5.)
    voice, breath = rattle()
    bird = place(voice + buzz(), 0.045, -11.5, 0.22, -17.0, 1.0)
    bird += place(breath, 0.05, 1.5, 0.25, -7.5, 2.1)  # hiss scatters off the bars
    bird += place(rasp(), 0.044, 0.39, 0.31, -5.0, 6.0)  # head turned away: more of the walls
    return bird + neighbour + far + insect + strikes + hum + air() + swells()


def record(dry):
    """Dynamic compression and low-pass filtering: loud bursts are eased and the microphone cuts the top."""
    top_hz, threshold = 15700, .54
    peak = uniform_filter1d(-minimum_filter1d(-abs(dry).max(axis=0), size=260), size=260)
    gain = np.minimum(1, threshold / (peak + 1e-9)) ** .8
    low_pass = signal.ellip(12, .2, 90, top_hz, fs=SR, output="sos")
    return signal.sosfilt(low_pass, dry * gain)


dry = scene()
out = record(dry)
store_pcm(out)
```